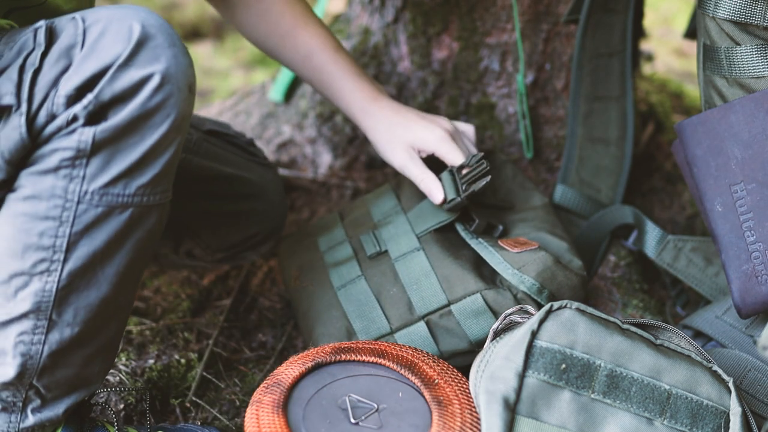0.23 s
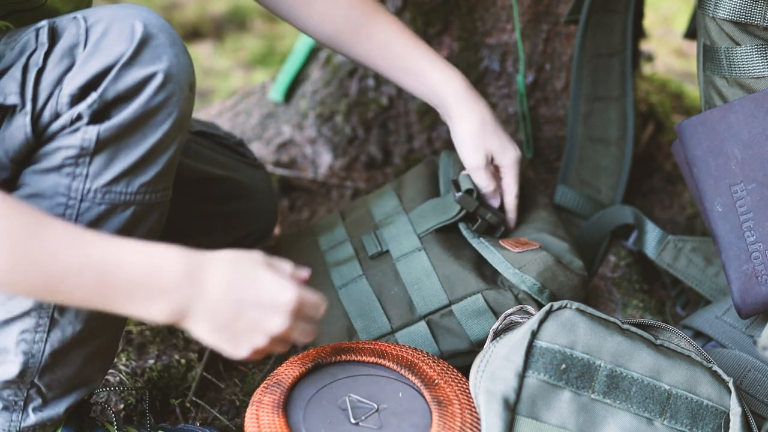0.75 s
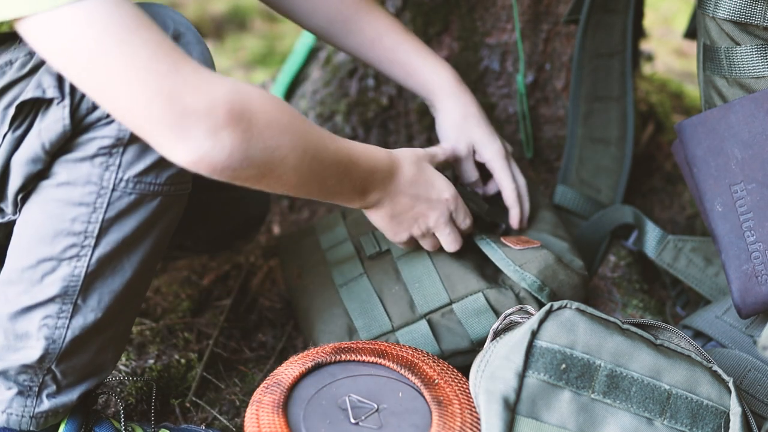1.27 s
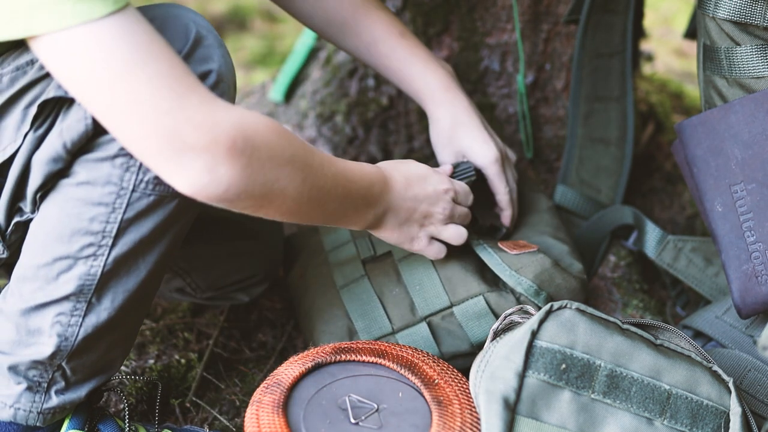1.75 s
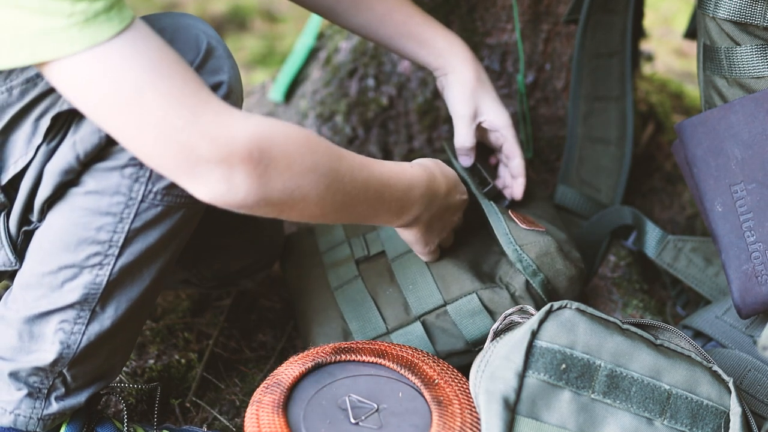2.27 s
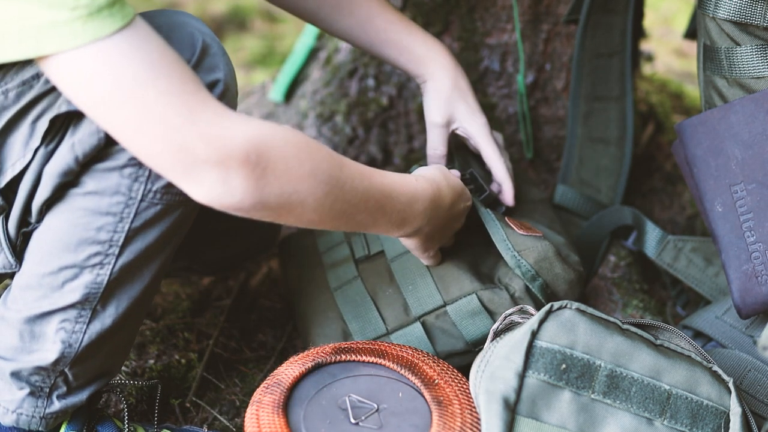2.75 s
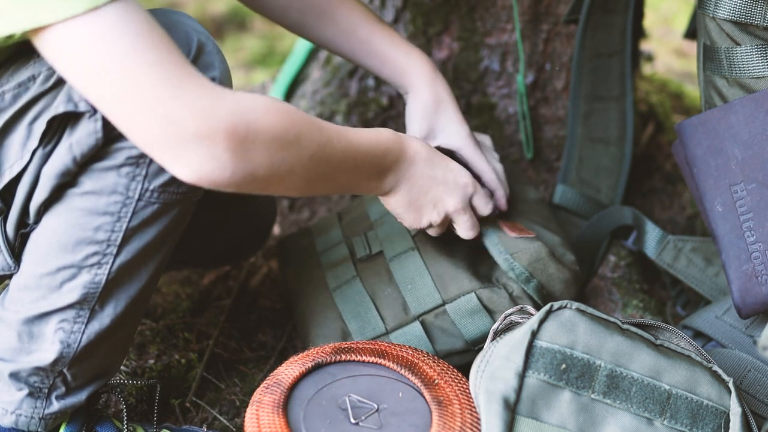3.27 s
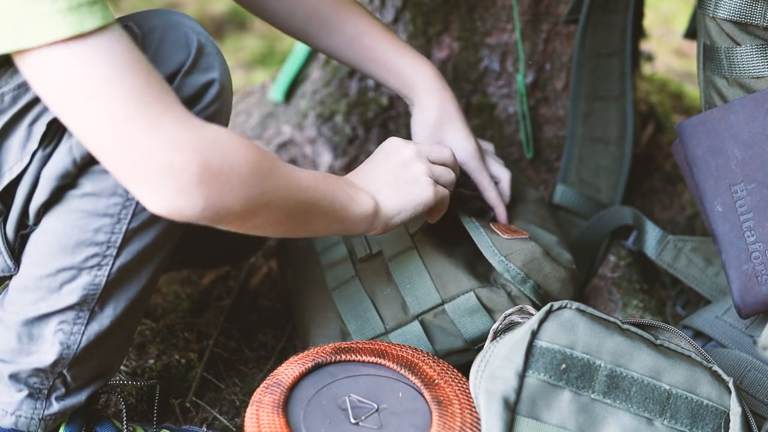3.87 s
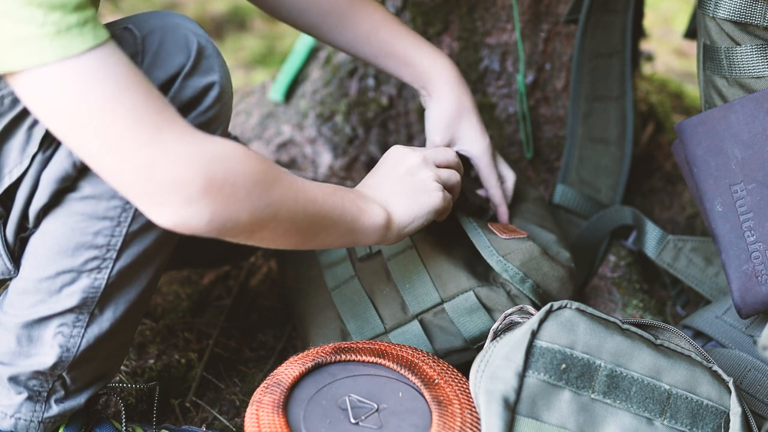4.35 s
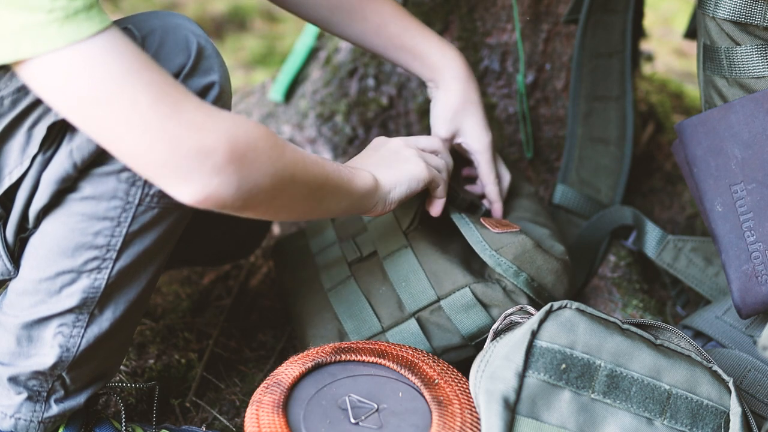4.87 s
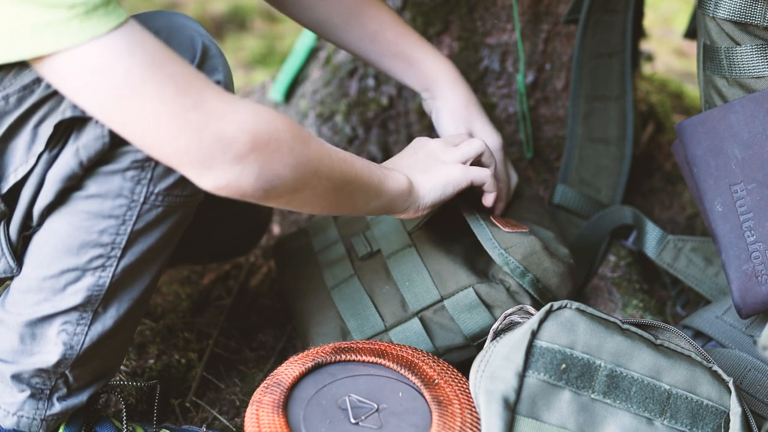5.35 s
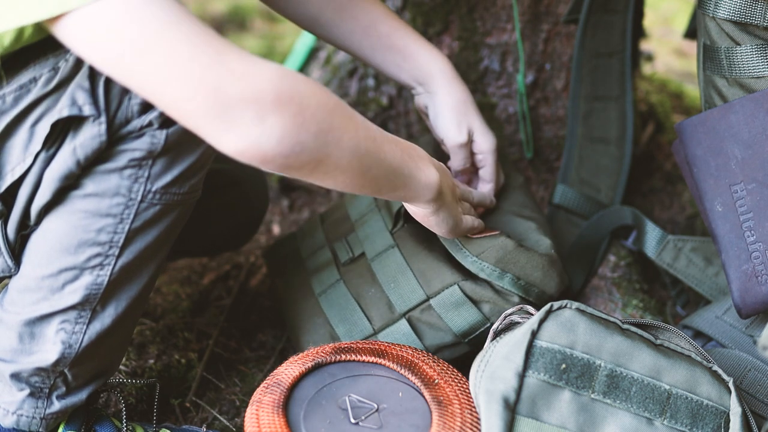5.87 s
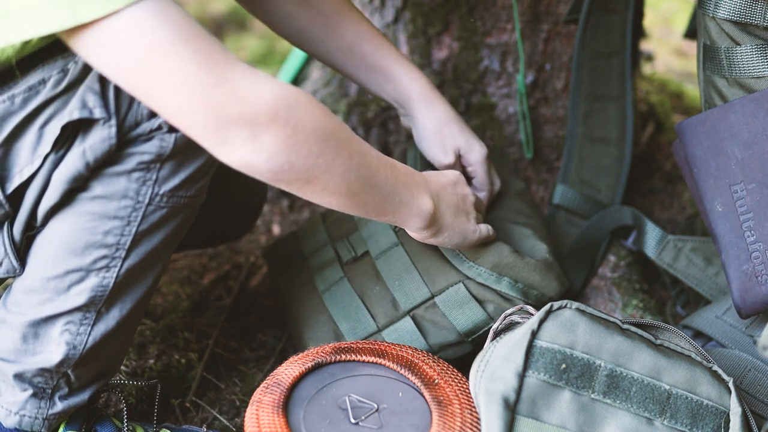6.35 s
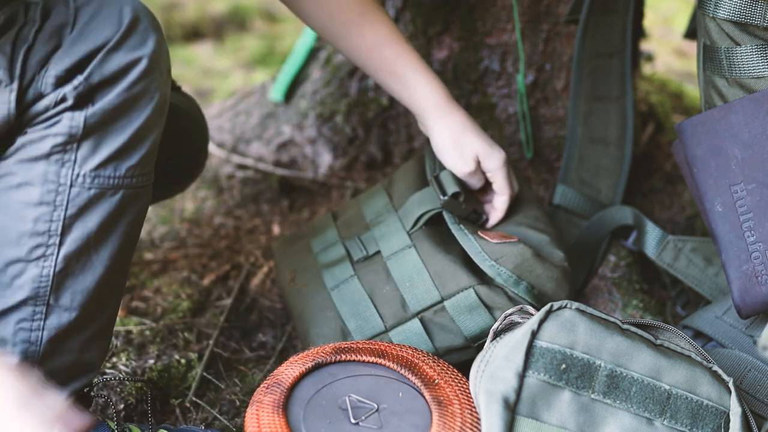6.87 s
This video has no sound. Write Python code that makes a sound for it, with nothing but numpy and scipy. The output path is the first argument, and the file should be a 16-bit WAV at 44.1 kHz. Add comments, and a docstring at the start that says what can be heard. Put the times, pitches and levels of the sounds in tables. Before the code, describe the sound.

Close, dry clicks of a plastic strap buckle over faint nylon rustle, then one very loud snap; distant birds whistle and trill behind.

```python
"""A plastic side-release buckle ticks, scrapes and at last snaps shut while webbing and pack cloth rustle.
Small birds whistle and trill far off in the woods, over faint hiss and mains hum; the image is all but mono.
Knocks, scrapes and the snap drive banks of damped modes; the strap zip is a train of rib bumps.
Rustle is filtered random grains, birds are gliding sines, and the trunks' soft tail is decaying noise."""
import sys
import numpy as np
from scipy import signal
from scipy.fft import rfft, irfft
from scipy.io import wavfile
from scipy.ndimage import uniform_filter1d

SR = 44100
rng = np.random.default_rng(int(sys.argv[2]) if len(sys.argv) > 2 else 0)


def digitize_waveform(pressure):
    """Quantize a signal to 16-bit integers and store it at the path in sys.argv[1].

    Rows of a 2-D input are taken as channels; values are limited to [-1, 1].
    """
    field = np.atleast_2d(pressure).T
    bounded = np.clip(field, -1, 1)
    quanta = np.round(bounded * 32767).astype(np.int16)
    wavfile.write(sys.argv[1], SR, quanta)


N = 313992

# Buckle knocks. Each row: start in seconds, peak in dB, part that rings most in Hz, thud of the pack in dB,
# brightness in dB per octave.
KNOCK_EVENTS = [(0.3148, -31.5, 1750, -59, 0), (0.463, -51.5, 4600, -73, -4), (0.524, -57, 2630, -73, 2),
                (0.6761, -22, 1995, -48, 1), (0.8014, -41.5, 2130, -58, -0.5),
                (0.8098, -21.5, 2400, -46, 8.5), (0.8239, -28, 2100, -46.5, -1.5),
                (0.8765, -32.5, 2500, -47.5, 6), (1.1083, -43, 2670, -50, -3), (1.274, -43, 2620, -74, 2),
                (1.4173, -35, 2490, -61, 4), (1.487, -43.5, 4700, -69, 8), (1.5342, -53, 4530, -49, 1),
                (1.9714, -40, 2960, -42, 2), (1.981, -44, 2500, -51, -2), (2.258, -46, 2520, -61, -4),
                (3.4113, -48, 4100, -68, -9), (3.4568, -35.5, 2600, -49, -5.5),
                (3.486, -37, 2760, -76, -1.5), (3.973, -47, 2500, -81, -3), (4.065, -52, 2800, -73, -3),
                (4.12, -40, 2430, -67, -1.5), (4.133, -43.5, 1790, -42.5, -5), (4.2206, -42, 4610, -62, 2),
                (4.2855, -45.5, 4800, -62, 1), (4.33, -53, 3000, -75, -2), (4.4004, -49, 2500, -58, -24),
                (4.4811, -37.5, 3830, -53.5, -9.5), (4.5022, -49.5, 3240, -57, -3),
                (4.8889, -33.5, 2430, -64, -3), (4.8934, -22, 2540, -53, 4.5), (4.9412, -42, 2540, -54, 1),
                (5.047, -47, 2600, -53, -7)]
# Edges that skid ring brighter and chatter longer.
CONTACT_MS, BRIGHT_CONTACT_MS_PER_DB = 2.45, 0.43
# The dropped half bounces three times on the pack, each time weaker but with more thud.
BOUNCE_S, BOUNCE_GAP_S, BOUNCE_HZ, BOUNCE_BRIGHT_DB = 0.6867, 0.0094, 2500, -2.5
BOUNCE_DB, BOUNCE_LOSS_DB, BOUNCE_THUD_DB, BOUNCE_THUD_GAIN_DB = -33, 2.3, -66, 7.5
# Buckle halves dragged over each other. Each row: start in seconds, length in seconds, peak in dB.
SCRAPE_EVENTS = [(0.861, 0.035, -40), (1.38, 0.032, -36), (3.846, 0.049, -36.5), (4.43, 0.05, -50.5)]
# The latch snapping home. One row: start in seconds, peak in dB, thud in dB, contact decay in ms.
SNAP_EVENT = (6.2874, 0.5, -30, 4.5)
# Modes of the loose halves. Each row: frequency in Hz, relative level in dB.
LOOSE_MODES = [(1150, -16.5), (1830, -5), (2080, -3.5), (2480, -2), (2790, -4.5), (3300, -5), (3800, -2.5),
               (4600, -5), (5500, -5.5), (6300, -7), (7400, -5.5), (8200, -8.5), (9600, -16.5)]
# Modes of the joined halves, ringing as one body. Each row: frequency in Hz, relative level in dB.
JOINED_MODES = [(1300, -21), (1830, -6.5), (2120, -6), (2780, -4.5), (3360, -0.5), (3950, -6.5), (4590, -9),
                (5400, -5.5), (5880, -5.5), (7600, -9.5), (8310, -10.5), (9430, -7.5)]
# Modes of the stuffed pack. Each row: frequency in Hz, relative level in dB, t60 under a knock in seconds.
PACK_MODES = [(240.8, -0.5, 0.013), (403, 3, 0.014), (790, -0.5, 0.006)]
# Webbing ribs running over the buckle bar. Each row: time in seconds, ribs per second, level in dB.
ZIP_CURVE = [(1.334, 156, -61), (1.369, 270, -49), (1.39, 480, -42.5), (1.406, 850, -42), (1.413, 630, -59)]
# Strokes of the hands over the cloth. Each row: start in seconds, length in seconds,
# relative bright rustle in dB, relative dull rustle of the pack in dB.
RUSTLE_STROKES = [(0.0, 0.092, -63, -65.5), (0.188, 0.24, -59.5, -66), (0.27, 0.067, -44.5, -53.5),
                  (0.8, 0.18, -59.5, -62), (1.23, 0.4, -62, -67.5), (1.614, 0.13, -61, -67.5),
                  (1.346, 0.1, -59, -62), (1.778, 0.13, -60.5, -70), (1.954, 0.083, -62, -61),
                  (2.071, 0.29, -63.5, -64.5), (2.492, 0.13, -71, -74.5), (3.099, 0.11, -66.5, -80),
                  (3.347, 0.2, -69, -70), (4.113, 0.093, -61.5, -68), (4.91, 0.22, -62, -63.5),
                  (5.159, 0.13, -63, -73), (5.488, 0.062, -68, -83), (5.782, 0.15, -58.5, -78),
                  (5.965, 0.22, -70.5, -74.5), (6.705, 0.1, -58.5, -76), (6.809, 0.12, -59, -76)]
# Spectrum of rubbed nylon. Each row: frequency in Hz, relative density in dB per Hz.
NYLON_SPECTRUM = [(350, -42.5), (600, -12.5), (1260, 0), (1570, -7), (2150, 0), (6030, -6.5), (8390, -5.5),
                  (16000, -26.5)]
# Bird call shapes. One row each: length in seconds, first pitch in Hz, last pitch in Hz,
# bend (under 1 glides early, over 1 late). The hook scoops up and holds, the seep is thin
# and almost level, the rise flicks upward.
HOOK_SHAPE = (.075, 3150, 4200, .33)
SEEP_SHAPE = (0.037, 6250, 6700, .28)
RISE_SHAPE = (0.038, 5300, 7080, 1.9)
# Calls of each shape. Each row: start in seconds, pitch shift in semitones, relative level in dB.
HOOK_CALLS = [(1.459, 1.6, -58), (3.17, -0.055, -55), (3.351, -0.36, -51.5), (3.514, -0.78, -56.5),
              (3.675, -0.51, -60.5), (4.18, 1.9, -54.5), (6.76, -0.3, -59)]
SEEP_CALLS = [(1.165, 0.1, -61.5), (1.255, 0.1, -60), (4.475, 0.1, -65.5), (4.565, -0.47, -62.5),
              (6.75, -0.6, -68)]
RISE_CALLS = [(2.215, 0.1, -60), (2.314, 0.22, -59.5), (2.421, -0.2, -61)]
FORK_S, FORK_DB = 0.017, -3   # each upward flick is doubled just after
# Calls that slur down, late and fast. Each row: start in seconds, length in seconds, first pitch in Hz,
# last pitch in Hz, relative level in dB.
FALL_CALLS = [(2.078, 0.066, 8500, 7200, -63), (3.245, 0.057, 6200, 4670, -68),
              (5.57, .04, 7400, 6600, -75), (5.702, 0.027, 7500, 6500, -64.5),
              (5.85, 0.037, 7240, 5150, -58), (6.0, 0.051, 6700, 5850, -66.5),
              (6.051, 0.059, 4780, 4200, -60)]
FALL_BEND = 1.8
# High trill: six evenly spaced notes that swell and fade; each lifts a little, the phrase sags.
TRILL_S, NOTE_GAP_S, NOTE_S = 3.101, 0.183, 0.155
TRILL_DB, TRILL_LOUDEST_S, TRILL_FADE_DB_PER_S = -57, 3.68, 5.5
TRILL_HZ, TRILL_SAG_HZ_PER_S, NOTE_LIFT_HZ = 7940, 200, 250
WARBLE_RATE_HZ, WARBLE_DEPTH_HZ = 125, 270
# Decay of the woods. Each row: frequency in Hz, t60 in seconds.
WOOD_T60 = [(1000, 0.62), (2600, 0.71), (7000, 0.62), (13000, 0.31)]
# Leaves and microphone hiss. Each row: frequency in Hz, relative density in dB per Hz.
AIR_SPECTRUM = [(15, -36), (25, -19.5), (120, -7.5), (161, -7), (427, -10), (1260, -14), (1610, -15),
                (2410, -17.5), (7920, -20.5), (10100, -23.5), (13600, -20.5), (16000, -24)]
AIR_DB = -66.5
# Mains hum. Each row: frequency in Hz, mean sine amplitude in dB.
HUM_TONES = [(60, -76.5), (120, -72.5)]
# Very faint noise, opposite in the two channels. Each row: frequency in Hz, relative density in dB per Hz.
SIDE_NOISE_SPECTRUM = [(60, -11), (300, 3.5), (1500, -8), (6000, -1.5), (11500, 3), (16000, -24)]
SIDE_ECHO_DB, SIDE_NOISE_DB = -14.5, -85
CUTOFF_HZ = 16500

PIECE_T = np.arange(4000) / SR   # time axis of one buckle event, s


def from_db(db):
    """Gain of a level in dB."""
    return 10 ** (np.asarray(db) / 20)


def rms_one(x):
    """Scale to rms 1."""
    return x / np.sqrt(np.mean(x ** 2) + 1e-20)


def at_hz(points, hz):
    """Read a (Hz, value) table on a log frequency axis."""
    points = np.array(points)
    return np.interp(np.log(np.maximum(hz, 1)), np.log(points[:, 0]), points[:, 1])


def add(track, s, piece):
    """Mix a piece into the track from second s."""
    i = round(s * SR)
    track[i:i + len(piece)] += piece[:N - i]


def drift(rate_hz):
    """Slow random wander of spread 1: two-pole low-passed noise."""
    step = 40   # samples between drawn points
    pole = np.exp(-2 * np.pi * rate_hz * step / SR)
    noise = rng.standard_normal(N // step + 2002)
    slow = signal.lfilter([1], [1, -2 * pole, pole * pole], noise)[2000:]   # drop the filter's start
    return np.interp(np.arange(N) / step, np.arange(len(slow)), rms_one(slow - slow.mean()))


def colour(x, spectrum):
    """Give a noise a spectrum; rms 1."""
    bins_hz = np.arange(N // 2 + 1) * SR / N
    return rms_one(irfft(rfft(x) * from_db(at_hz(spectrum, bins_hz)), N))


def band_pass(x, low_hz, high_hz):
    """Second-order Butterworth band."""
    return signal.sosfilt(signal.butter(2, [low_hz, high_hz], "band", fs=SR, output="sos"), x)


def ring(force, hz, t60_s):
    """One damped mode: a unit click sets a sine of height about 1 ringing."""
    pole, w = from_db(-60 / (t60_s * SR)), 2 * np.pi * hz / SR
    return signal.lfilter([0, np.sin(w)], [1, -2 * pole * np.cos(w), pole * pole], force)


def strike(force, modes, focus_hz, bright_db, focus_db=9.0):
    """The force shakes all modes, weighted near the part touched, and cracks in the air; height about 1."""
    out = from_db(-6.5 + 1.84 * bright_db) * rms_one(np.diff(force, prepend=0))   # crack
    for k, (hz, level_db) in enumerate(modes):
        near = np.exp(-0.5 * (np.log2(hz / focus_hz) / 0.12) ** 2)   # width in octaves
        gain = from_db(level_db + focus_db * near + bright_db * np.log2(hz / 2500))
        t60_s = 0.012 * (2500 / hz) ** 0.47   # plastic damps treble first
        out = out + (-1) ** k * gain * rms_one(ring(force, hz, t60_s))
    loudness = np.sqrt(np.abs(uniform_filter1d(out ** 2, size=88)))   # over 2 ms
    return out / (2 * loudness.max())


def chatter(contact_ms, click):
    """Contact force: a first click, then noise that dies exponentially."""
    noise = rng.standard_normal(len(PIECE_T)) * np.exp(-1000 * PIECE_T / contact_ms)
    return noise + click * (PIECE_T == 0)


def pack_thud():
    """A single push sets the stuffed pack's modes ringing."""
    push = 1.0 * (PIECE_T == 0)
    return sum(from_db(level_db) * ring(push, hz, t60_s) for hz, level_db, t60_s in PACK_MODES)


def snap():
    """The latch shuts: chattering contact rings the joined halves and thuds into the pack."""
    out = np.zeros(N)
    s, peak_db, thud_db, contact_ms = SNAP_EVENT
    click = strike(chatter(contact_ms, 4), JOINED_MODES, 3360, 0, focus_db=-1)
    add(out, s, from_db(peak_db) * click + from_db(thud_db) * pack_thud())
    return out


def knocks():
    """A few ms of chattering contact ring the loose halves, with a push into the pack."""
    out, thud = np.zeros(N), pack_thud()
    bounces = [(BOUNCE_S + k * BOUNCE_GAP_S, BOUNCE_DB - k * BOUNCE_LOSS_DB, BOUNCE_HZ,
                BOUNCE_THUD_DB + k * BOUNCE_THUD_GAIN_DB, BOUNCE_BRIGHT_DB) for k in range(3)]
    for s, peak_db, focus_hz, thud_db, bright_db in KNOCK_EVENTS + bounces:
        contact_ms = CONTACT_MS + BRIGHT_CONTACT_MS_PER_DB * max(bright_db, 0)
        click = strike(chatter(contact_ms, 1), LOOSE_MODES, focus_hz, bright_db)
        add(out, s, from_db(peak_db) * click + from_db(thud_db) * thud)
    return out


def scrapes():
    """A long rough contact: noise under an arch drives the loose halves' modes."""
    out = np.zeros(N)
    for s, length_s, peak_db in SCRAPE_EVENTS:
        arch = np.sin(np.pi * np.minimum(PIECE_T / length_s, 1)) ** 0.5
        drag = rng.standard_normal(len(PIECE_T)) * arch
        add(out, s, from_db(peak_db) * strike(drag, LOOSE_MODES, 2590, -1.1))
    return out


def strap_zip():
    """Each rib is a rounded, uneven bump; the bump rate follows the strap's speed."""
    s, ribs_per_s, level_db = np.transpose(ZIP_CURVE)
    t = np.arange(s[0], s[-1], 1 / SR)
    rate_hz = np.interp(t, s, ribs_per_s) * (1 + 0.294 * drift(230)[:len(t)])
    phase = 2 * np.pi * np.cumsum(rate_hz) / SR
    size = from_db(np.interp(t, s, level_db) + 4.3 * drift(190)[:len(t)])
    out = np.zeros(N)
    add(out, s[0], size * (np.sin(phase) + 0.46 * np.sin(2 * phase)))
    return out


def grains(per_s, spread_db):
    """Random clicks of uneven size and either sign."""
    sizes = from_db(spread_db * np.minimum(rng.exponential(1, N), 4)) * rng.choice([-1, 1], N)
    return sizes * (rng.random(N) < per_s / SR)


def rustle():
    """Nylon fibres slip in dense uneven grains; the pack body rumbles under the fingers."""
    bright, dull = np.zeros((2, N))
    for s, length_s, bright_db, dull_db in RUSTLE_STROKES:
        u = np.linspace(0, 1, round(length_s * SR))
        stroke = np.sin(np.pi * u ** 0.87).clip(0) ** 0.75
        add(bright, s, from_db(bright_db) * stroke)
        add(dull, s, from_db(dull_db) * stroke)
    idle = from_db(-74.5 + 3.0 * drift(3.6))   # sleeves never lie quite still
    slips = colour(grains(4000, spread_db=3.0), NYLON_SPECTRUM)
    patchy = 0
    for k, low_hz in enumerate(550 * 2 ** np.arange(5)):   # each octave flickers on its own
        fold = band_pass(slips, low_hz, 2 * low_hz)
        patchy = patchy + (-1) ** k * from_db(1.6 * drift(12)) * fold
    fibres = patchy * (bright + idle) * from_db(1.5 * drift(40) - 4.3)
    # under the fingers the modes die sooner
    rumble = sum(from_db(level_db) * ring(grains(900, spread_db=2.0), hz, 0.65 * t60_s)
                 for hz, level_db, t60_s in PACK_MODES)
    return fibres + rms_one(rumble) * dull * from_db(3.4 * drift(30))


def whistle(length_s, first_hz, last_hz, bend):
    """A sine that glides; early gliders swell as they reach pitch."""
    u = np.linspace(0, 1, round(length_s * SR))
    glide = u ** bend if bend > 1 else 1 - (1 - u) ** (1 / bend)
    swell = np.sin(np.pi * u).clip(0) ** 0.7 * (glide ** 2 if bend < 1 else 1)
    pitch_hz = first_hz + (last_hz - first_hz) * glide
    return swell * np.sin(2 * np.pi * np.cumsum(pitch_hz) / SR)


def calls():
    """Short gliding whistles: hooks, seeps, doubled rises and falls."""
    out = np.zeros(N)
    forks = [(s + FORK_S, semitones, level_db + FORK_DB) for s, semitones, level_db in RISE_CALLS]
    groups = [(HOOK_SHAPE, HOOK_CALLS), (SEEP_SHAPE, SEEP_CALLS), (RISE_SHAPE, RISE_CALLS + forks)]
    for (length_s, first_hz, last_hz, bend), events in groups:
        for s, semitones, level_db in events:
            shift = 2 ** (semitones / 12)
            add(out, s, from_db(level_db) * whistle(length_s, shift * first_hz, shift * last_hz, bend))
    for s, length_s, first_hz, last_hz, level_db in FALL_CALLS:
        add(out, s, from_db(level_db) * whistle(length_s, first_hz, last_hz, FALL_BEND))
    return out


def trill():
    """Sine notes whose pitch warbles fast and unevenly about its centre."""
    out = np.zeros(N)
    warble = np.sin(2 * np.pi * np.cumsum(WARBLE_RATE_HZ * (1 + 0.2 * drift(40.8))) / SR)
    u = np.linspace(0, 1, round(NOTE_S * SR))
    swell = np.sin(np.pi * u).clip(0) ** 0.3
    for s in TRILL_S + NOTE_GAP_S * np.arange(6):
        centre_hz = TRILL_HZ - TRILL_SAG_HZ_PER_S * (s - TRILL_S) + NOTE_LIFT_HZ * (u - 0.5)
        pitch_hz = centre_hz + WARBLE_DEPTH_HZ * warble[round(s * SR):][:len(u)]
        level_db = TRILL_DB - TRILL_FADE_DB_PER_S * abs(s - TRILL_LOUDEST_S)
        add(out, s, from_db(level_db) * swell * np.sin(2 * np.pi * np.cumsum(pitch_hz) / SR))
    return out


def birds():
    """The long path through leaves makes the level of calls and trill flutter."""
    return (calls() + trill()) * from_db(4.0 * drift(90))


def trunks(x, first_s, swell_s):
    """Countless scattered echoes: noise that swells in, then dies band by band."""
    t, tail = np.arange(SR) / SR, 0
    edges_hz = 500 * 2 ** np.arange(0, 5.1, 0.5)
    for low_hz, high_hz in zip(edges_hz, edges_hz[1:]):
        band = band_pass(rng.standard_normal(SR), low_hz, high_hz)
        tail = tail + band * from_db(-60 * t / at_hz(WOOD_T60, np.sqrt(low_hz * high_hz)))
    tail = tail * (1 - np.exp(-np.maximum(t - first_s, 0) / swell_s))
    return signal.fftconvolve(x, tail / np.sqrt(np.sum(tail ** 2)))[:N]


def background():
    """Nearly steady coloured hiss and mains sines that waver in level and phase."""
    t, hum = np.arange(N) / SR, 0
    for hz, level_db in HUM_TONES:
        level = from_db(level_db + 1.9 * drift(5.4))
        hum = hum + level * np.sin(2 * np.pi * hz * t + 0.8 * drift(4))
    return hum + from_db(AIR_DB + 0.9 * drift(3.1)) * colour(rng.standard_normal(N), AIR_SPECTRUM)


def scene():
    """Near hands are mostly dry, far birds part echo; near echoes and a little faint noise differ left to right."""
    near = snap() + knocks() + scrapes() + strap_zip() + rustle()
    # the near sounds lose their bass below about 170 Hz
    near = signal.sosfilt(signal.butter(2, 170, "high", fs=SR, output="sos"), near)
    far = birds()
    near_sent = from_db(-23.5) * near
    side_echo = from_db(SIDE_ECHO_DB) * trunks(near_sent, 0.02, 0.012)
    side_noise = from_db(SIDE_NOISE_DB) * colour(rng.standard_normal(N), SIDE_NOISE_SPECTRUM)
    side = side_echo + side_noise
    echo = trunks(near_sent + from_db(-8) * far, 0.0047, 0.0082)
    return near + from_db(-0.7) * far + echo + background() + np.array([side, -side])


def record(dry):
    """The snap overloads the input and is rounded off at full scale; the top is cut."""
    clipped = dry / (1 + np.abs(dry) ** 4) ** 0.25
    return signal.sosfilt(signal.cheby2(14, 60, CUTOFF_HZ, fs=SR, output="sos"), clipped)


dry = scene()
out = record(dry)
digitize_waveform(out)
```